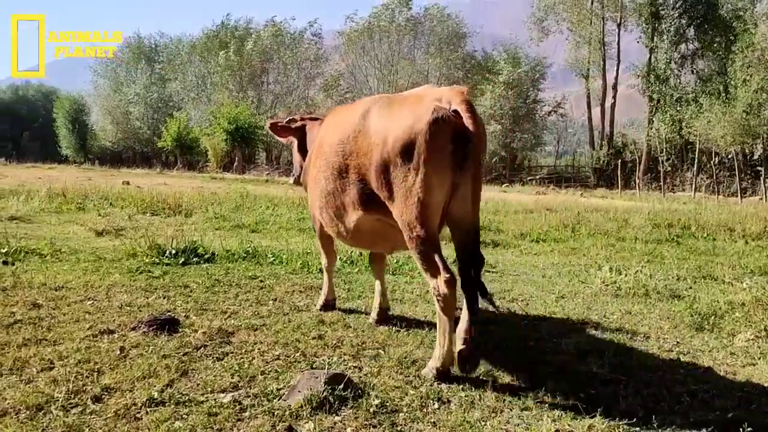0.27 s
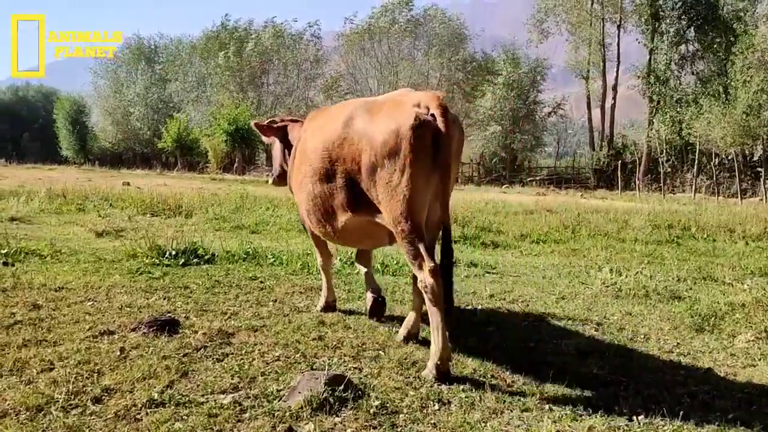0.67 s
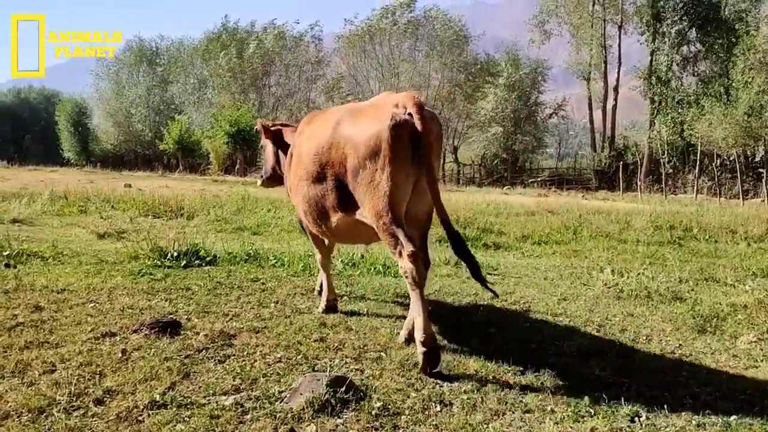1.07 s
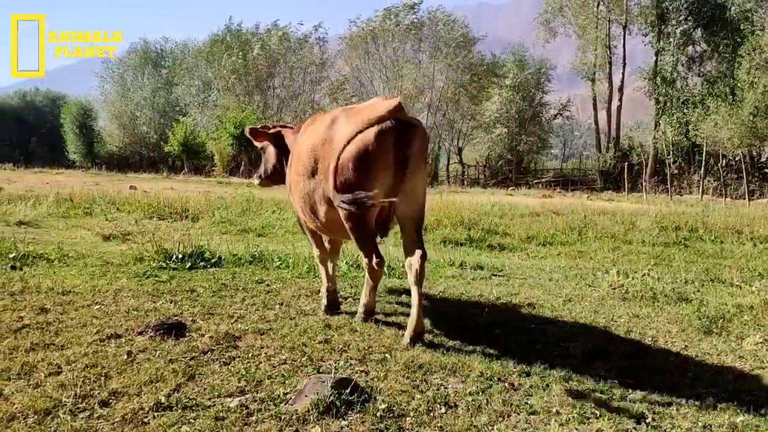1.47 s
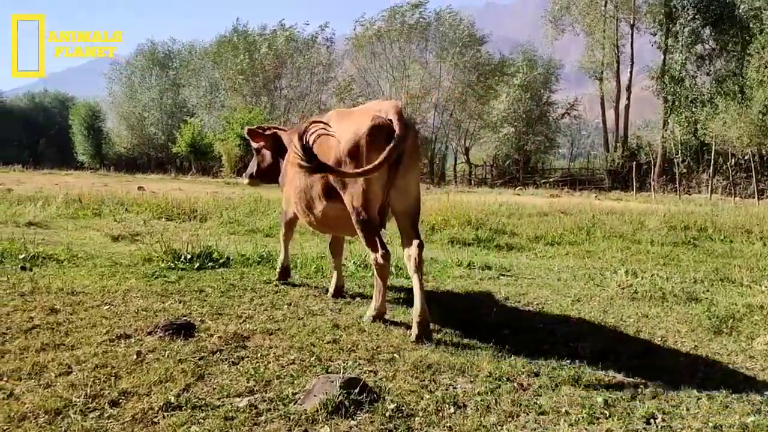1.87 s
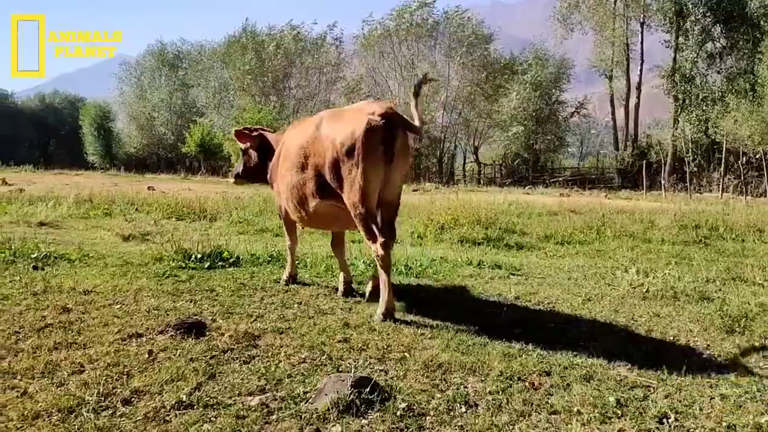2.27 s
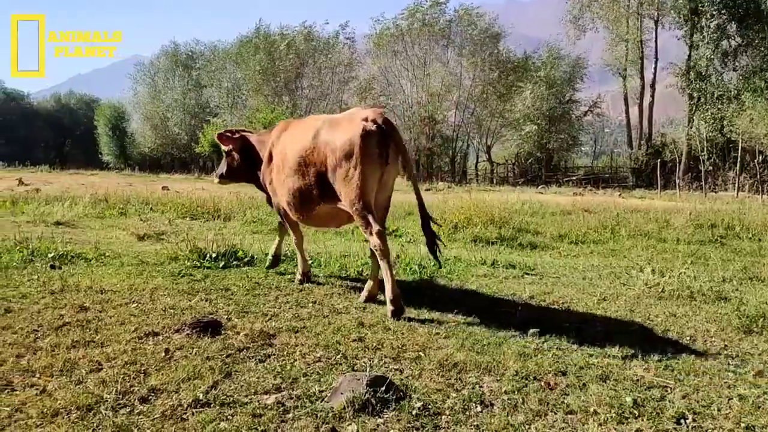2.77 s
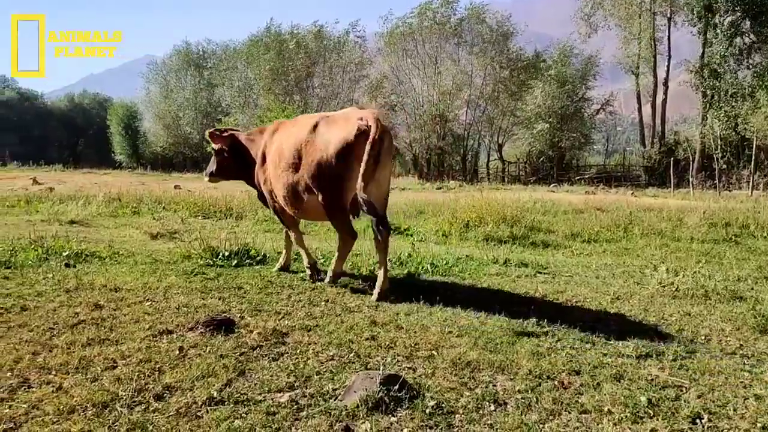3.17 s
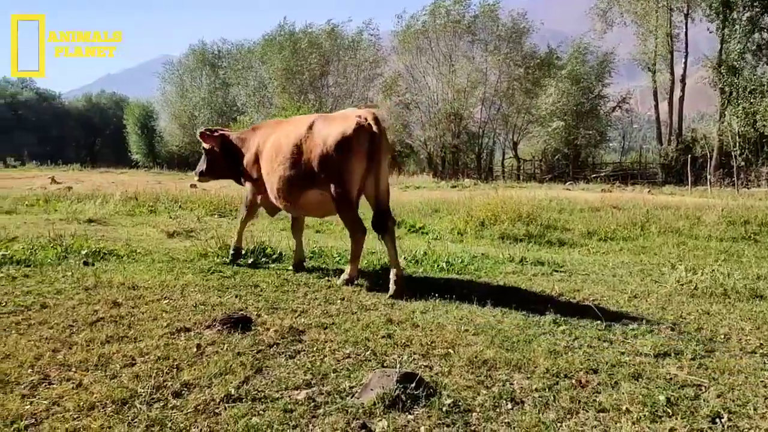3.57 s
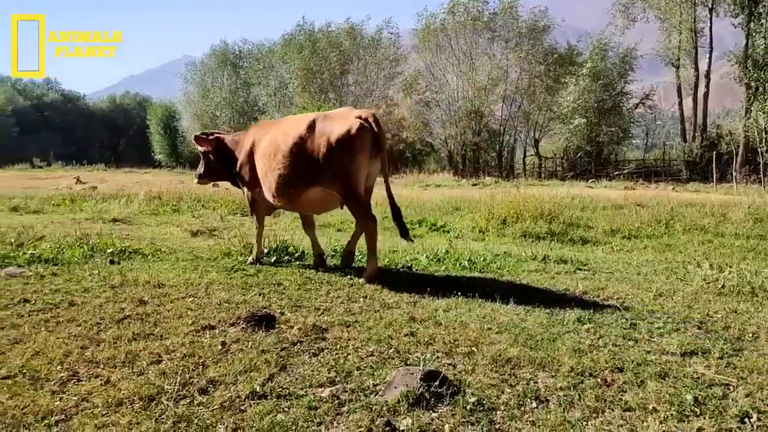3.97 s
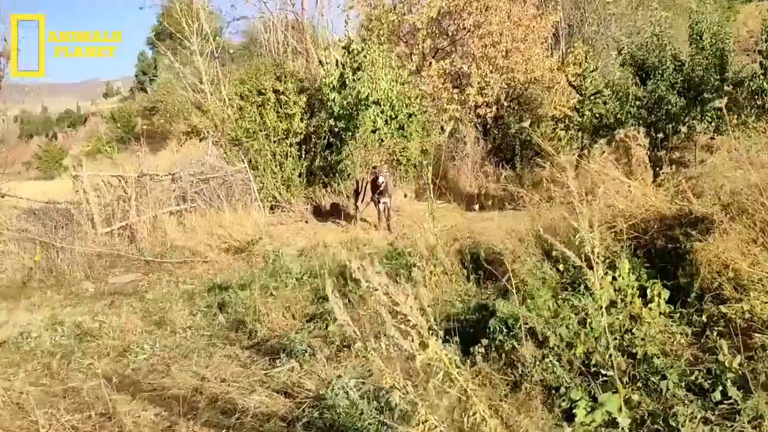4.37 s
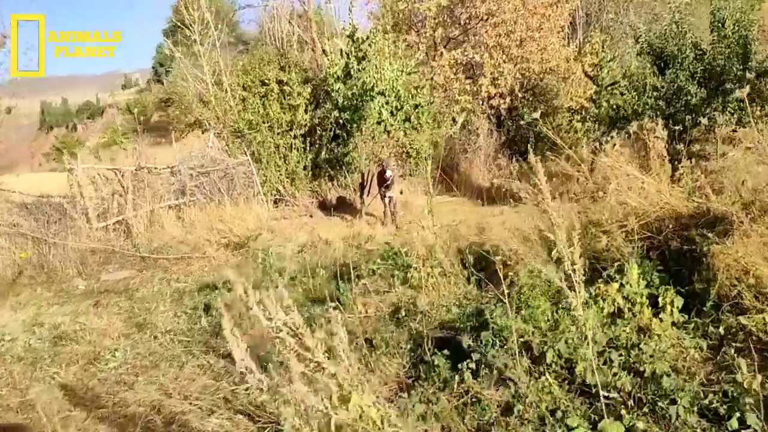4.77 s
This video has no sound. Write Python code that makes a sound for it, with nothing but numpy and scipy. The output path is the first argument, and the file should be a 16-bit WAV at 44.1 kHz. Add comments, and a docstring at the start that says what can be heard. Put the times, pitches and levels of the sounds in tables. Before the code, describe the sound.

From 0 to about 2.6 s an open pasture is quiet: a soft broad hiss of distant trees, light low wind rumble with small thumps on the microphone, faint chirping birds and thin far calls in the first second and a half, and tiny stalk ticks. Around 2.7 s a cow begins a low, buzzing nasal hum. At about 3.0 s its mouth opens and the moo becomes loud, deep and resonant, held nearly steady, then sagging from 3.6 s into a slow, rough rasp that ends near 4.1 s with a short diffuse echo. Wind is stronger here, with heavy buffets around 3.4 to 3.6 s and again near 4.2 s. At 4.25 s a higher, rough bleating call bursts in, loses its low voice by 4.6 s, and thins to a squeal flipping slightly upward until 4.95 s. Dry grass rustles close by from 4.35 s, with crisp snaps toward the end.

```python
"""A pasture: a cow moos, first a nasal hum, then through the open mouth as the voice sinks into a rasp.
A second, higher call thins to a squeal while dry grass rustles close by.
Both calls are fold pulses and sine harmonics, the pulses shaped by resonances of throat, mouth and nose.
Wind, grass and distant trees are coloured noise; small birds and thin far calls are gliding sines."""
import sys
import numpy as np
from scipy import signal
from scipy.fft import rfft, irfft, next_fast_len
from scipy.io import wavfile
from scipy.ndimage import uniform_filter1d, map_coordinates

SR = 44100
rng = np.random.default_rng(int(sys.argv[2]) if len(sys.argv) > 2 else 0)


def to_wav(s):
    """Save 16-bit WAV."""
    ch = np.atleast_2d(s).T  # columns
    pcm = np.round(np.clip(ch, -1, 1) * 32767)  # PCM
    wavfile.write(sys.argv[1], SR, pcm.astype(np.int16))


N = 221734


def seconds():
    """Time of every sample in seconds."""
    return np.arange(N) / SR


def amp(db):
    """Decibels to gain."""
    return 10 ** (np.asarray(db) / 20)


def unit(x):
    """x at rms 1."""
    return x / np.sqrt(np.mean(x ** 2) + 1e-20)


def along(points, hz):
    """(Hz, value) points read on a log frequency axis."""
    point_hz, value = np.transpose(points)
    return np.interp(np.log(hz + 1), np.log(point_hz + 1), value)


def curves(rows):
    """One value per sample for each column after the time."""
    time_s, *columns = np.transpose(rows)
    return [np.interp(seconds(), time_s, column) for column in columns]


def during(start, end, fade):
    """1 between two times, with linear fades inside them."""
    t = seconds()
    return np.clip(np.minimum(t - start, end - t) / fade, 0, 1)


def swell(start, attack, hold_until, t60, db):
    """Gain that rises, holds and dies away; times in seconds."""
    t = seconds()
    rise = 1 - np.exp(-np.maximum(t - start, 0) / attack)
    return rise * amp(db - 60 * np.maximum(t - hold_until, 0) / t60)


def wobble(rate_hz):
    """Smooth random curve through rate_hz random knots a second."""
    knots = rng.standard_normal(int(N * rate_hz / SR) + 4)
    return map_coordinates(knots, [np.arange(N) * rate_hz / SR])


def filtered(x, response):
    """x through a response given as a function of Hz."""
    size = 2 * next_fast_len(N // 2 + 8192)
    return irfft(rfft(x, size) * response(np.fft.rfftfreq(size, 1 / SR)), size)[..., :N]


def rush(spectrum, alike):
    """Stereo noise of rms 1 with a given colour and left-right likeness."""
    def mid_side_gain(hz):
        angle = np.arccos(np.clip(along(alike, hz), -1, 1)) / 2
        return amp(along(spectrum, hz)) * np.array([np.cos(angle), np.sin(angle)])
    mid, side = filtered(rng.standard_normal((2, N)), mid_side_gain)
    return unit(np.array([mid + side, mid - side]))


def pan(x, left_db):
    """Make left louder than right by left_db; negative leans right."""
    return x * amp([[left_db / 2], [-left_db / 2]])


# Wind strength on the microphone. Each row: time in seconds, strength in dB.
WIND_STRENGTH = [(0, -39), (0.12, -44), (0.21, -44), (0.38, -57), (0.6, -50.5), (0.7, -45), (0.85, -51),
                 (0.92, -45.5), (1.0, -47.5), (1.07, -43), (1.2, -47), (1.27, -55), (1.36, -46),
                 (1.43, -49), (1.53, -41.5), (1.69, -42), (1.77, -47.5), (1.94, -43), (2.01, -49),
                 (2.07, -44.5), (2.17, -46.5), (2.33, -42.5), (2.48, -43), (2.6, -37.5), (2.67, -43.5),
                 (2.9, -43), (3.2, -34), (3.55, -33.5), (3.72, -35.5), (3.87, -39.5), (4.06, -39),
                 (4.2, -38.5), (4.28, -38), (4.37, -37), (4.43, -43), (4.5, -39.5), (4.72, -43),
                 (4.88, -43.5), (5.03, -39)]
# Single buffets. Each row: centre in seconds, half length in seconds, level in dB, depth 0-1.
WIND_BUFFETS = [(0.028, 0.012, -27.5, 0.9), (0.185, 0.014, -37, 0.68), (0.786, 0.012, -41.5, 1),
                (1.09, 0.027, -39.5, 0.2), (1.62, 0.02, -41.5, 0.4), (1.672, 0.032, -37, 0.45),
                (1.961, 0.017, -37, 0.87), (2.058, 0.0078, -40.5, 0.25), (2.112, 0.0097, -31, 0.57),
                (2.323, 0.022, -40.5, 0.5), (2.396, 0.034, -43, 0), (2.54, 0.011, -36, 0.2),
                (2.706, 0.011, -32, 0.78), (3.024, 0.018, -30, 0.4), (3.184, 0.037, -29.5, 0),
                (3.371, 0.016, -24.5, 0.4), (3.415, 0.016, -26, 0.22), (3.481, 0.0098, -22, 0),
                (3.615, 0.027, -20.5, 0.34), (3.87, 0.021, -25.5, 1), (3.986, 0.016, -29, 0.18),
                (4.121, 0.011, -27, 0.13), (4.169, 0.017, -23, 0.07), (4.239, 0.011, -33, 0.4),
                (4.374, 0.033, -29, 0.9), (4.583, 0.014, -28, 0.4), (4.657, 0.018, -32.5, 0.26),
                (4.783, 0.018, -31.5, 0.63), (4.905, 0.011, -36, 0.3), (4.988, 0.016, -26.5, 0.68)]
# Side the wind strikes. Each row: time in seconds, left minus right in dB.
WIND_SIDE_DB = [(0, -2), (.7, -0.5), (1.2, -1.5), (1.8, -6.5), (2.3, -9), (2.7, -2.5), (3.5, -1), (4.3, 0),
                (4.8, -0.5)]
# Colour of the low wind noise. Each row: frequency in Hz, relative density in dB per Hz.
RUMBLE_COLOUR = [(10, -7.5), (28, 4), (45, 0.5), (62, 2), (90, -3), (130, -13.5), (200, -22), (400, -59),
                 (900, -110)]
# Colour of the faster wind noise. Each row: frequency in Hz, relative density in dB per Hz.
FLUTTER_COLOUR = [(30, -30), (65, -0.5), (100, -2), (150, -7), (220, -15), (320, -31), (500, -49),
                  (900, -80), (2000, -120)]
BREEZE_DB = -45.5  # strength at which the two levels below hold
RUMBLE_DB, RUMBLE_DB_PER_WIND_DB = -42.5, 0.77
FLUTTER_DB, FLUTTER_DB_PER_WIND_DB = -54, 1.55


def wind():
    """Eddies rumble on the microphone ports, brighter as the wind grows; single buffets thump."""
    t = seconds()
    gust_db = curves(WIND_STRENGTH)[0] - BREEZE_DB
    side_db, = curves(WIND_SIDE_DB)

    rumble_db = RUMBLE_DB + RUMBLE_DB_PER_WIND_DB * gust_db + 1.3 * wobble(15)
    rumble = amp(rumble_db) * rush(RUMBLE_COLOUR, [(25, 0.047), (70, 0.14), (200, 0.1)])
    flutter_db = FLUTTER_DB + FLUTTER_DB_PER_WIND_DB * gust_db + 6.85 * np.tanh(wobble(26))
    flutter = amp(flutter_db) * rush(FLUTTER_COLOUR, [(100, 0.88)])

    bounded = np.tanh(rush(FLUTTER_COLOUR, [(100, 0.88)]))  # a thump swings with bounded pressure
    eddies = filtered(bounded, lambda hz: 1 / (1 + (hz / 400) ** 6))
    sharp = unit(eddies)
    deep = unit(filtered(eddies, lambda hz: 1 / (1 + (hz / 75) ** 4)))
    thumps = 0
    for centre_s, half_s, db, depth in WIND_BUFFETS:
        push = np.exp(-((t - centre_s) / half_s) ** 2)
        thump = unit(push * ((1 - depth) * sharp + depth * deep))
        thumps += amp(db) * np.sqrt(np.mean(push ** 2)) * thump
    return (rumble + flutter + thumps) * amp([side_db / 2, -side_db / 2])


# Colour of the distant trees. Each row: frequency in Hz, relative density in dB per Hz.
TREES_COLOUR = [(180, -4), (300, -4), (620, -10), (781, -8), (921, -10), (1050, -8), (1140, -12),
                (1300, -10), (2830, -10), (3810, -11.5), (7360, -16), (8400, -24), (12500, -28.5),
                (15500, -30)]
# Level of the trees. Each row: time in seconds, level in dB.
TREES_LEVEL = [(0, -59), (4.12, -59.5), (4.15, -61.5), (4.5, -58.5)]
# Stereo spread of the trees. Each row: frequency in Hz, left-right likeness (1 = identical).
TREES_ALIKE = [(60, 0.02), (180, 0.097), (550, 0.85), (1650, 0.2), (4970, 0.23), (15000, 0.48)]


def trees():
    """Distant trees: a broad noise bed whose level sways slightly."""
    level_db = curves(TREES_LEVEL)[0] + 0.4 * wobble(3.2)
    return pan(amp(level_db) * rush(TREES_COLOUR, TREES_ALIKE), left_db=-2.5)


# Colour of brushing blades. Each row: frequency in Hz, relative density in dB per Hz.
STRAW_COLOUR = [(200, -2), (500, 6), (1400, 5), (2400, 6), (4000, -5), (7500, -1.5), (8800, -11),
                (12500, -7.5), (14200, -11), (14800, -44)]
# Stalks snapping. Each row: time in seconds, crackle in dB, body in dB re crackle, t60 in seconds.
STALK_SNAPS = [(0.1903, -70.5, 6, 0.2), (0.3062, -63, 0, 0.2), (0.338, -54, -10, 0.12),
               (0.4124, -68, -8, 0.19), (0.5367, -64.5, -14, 0.15), (0.6604, -65.5, -16, 0.16),
               (1.6315, -68, -4, 0.26), (2.1804, -64.5, -17, 0.29), (2.6034, -68, -6, 0.25),
               (4.581, -45.5, -17, 0.15), (4.766, -58.5, 10, 0.12), (4.816, -51.5, 10.5, 0.05),
               (4.908, -60, 7, 0.076)]


def grass():
    """Dry blades brush in dense crackles, and now and then a stalk bends and snaps."""
    t = seconds()
    grain = amp(1.7 * wobble(900) + 2.7 * wobble(45))
    rustle = unit(grain * rush(STRAW_COLOUR, [(500, 0.081), (2000, 0), (8000, 0.0)]))
    brush = swell(start=4.343, attack=0.16, hold_until=4.545, t60=1.82, db=-44.5) * rustle

    crackle, body = np.zeros(N), np.zeros(N)
    for snap_s, db, body_db, t60_s in STALK_SNAPS:
        bend_and_break = amp(db - 60 * np.maximum((snap_s - t) / 0.026, (t - snap_s) / t60_s))
        crackle += bend_and_break
        body += bend_and_break * amp(body_db)
    crisp_colour = [(2000, -23), (4500, 7.5), (8000, 4.0), (12500, 6.5), (14200, 5), (15000, -25)]
    dull_colour = [(200, -1), (600, 10.0), (2000, 3.5), (4000, -4.5), (8000, -27)]
    crisp = crackle * rush(crisp_colour, [(8000, 0.08)])
    dull = body * rush(dull_colour, [(1000, 0.14)])
    return pan(brush + (crisp + dull) * unit(amp(4.8 * wobble(500))), left_db=-6.0)


# Far birds. Each row: start in seconds, start pitch in Hz, end pitch in Hz, length in seconds,
# level in dB, hoarseness as a share of the pitch.
BIRD_CHIRPS = [(0.332, 4320, 3100, 0.11, -59, 0.11), (0.734, 4810, 3250, 0.13, -61, 0.09),
               (1.062, 4480, 5730, 0.082, -62.5, 0.12), (1.271, 4280, 2574, 0.09, -58.5, 0.14),
               (1.744, 4840, 3355, 0.17, -59, 0.12), (2.416, 5630, 4150, 0.081, -60, 0.2),
               (2.495, 2760, 3790, 0.051, -61.5, 0.079), (4.131, 5140, 4320, 0.054, -58.5, 0.055),
               (4.941, 4060, 4130, 0.047, -59.5, 0.048)]
# Thin far calls. Each row: start in seconds, end in seconds, pitch in Hz, level in dB.
FAR_NOTES = [(0.335, 0.46, 1088, -63.5), (0.5, 0.65, 1088, -69.5), (.7, 0.798, 1075, -62.5),
             (.81, 1.1, 1060, -67), (1.09, 1.416, 1052, -67.5), (0.32, 0.42, 2440, -69),
             (0.43, 0.6, 2440, -67.5), (0.673, 0.76, 2420, -69.5)]
FAR_SAG_PER_S, FAR_WAVER = 0.032, 0.0034  # shares of the pitch


def far_animals():
    """Sliding sines with hoarse pitch noise chirp; thin sines sag slowly."""
    t = seconds()
    out = np.zeros(N)
    trill = wobble(700)
    for start_s, start_hz, end_hz, length_s, db, hoarse in BIRD_CHIRPS:
        progress = np.clip((t - start_s) / length_s, 0, 1)
        pitch_hz = (start_hz + (end_hz - start_hz) * progress) * (1 + hoarse * trill)
        out += amp(db) * np.sin(np.pi * progress) * np.sin(2 * np.pi * np.cumsum(pitch_hz) / SR)

    waver = 1 + FAR_WAVER * wobble(59.0)
    flicker = amp(1.3 * wobble(11.76))
    for start_s, end_s, hz, db in FAR_NOTES:
        pitch_hz = hz * waver * (1 - FAR_SAG_PER_S * (t - start_s))
        tone = np.sin(2 * np.pi * np.cumsum(pitch_hz) / SR)
        out += amp(db) * flicker * during(start_s, end_s, fade=0.021) * tone
    return out


# Echo decay. Each row: frequency in Hz, t60 in seconds.
FIELD_DECAY = [(200, 0.57), (1500, 0.49), (5000, 0.94), (12000, 0.025)]


def echo(x):
    """Diffuse answer of the ground and the tree line: decaying stereo noise convolved with x."""
    hz, t, bins = signal.stft(rng.standard_normal((2, SR)), SR, nperseg=256)
    decay = amp(-60 * t / along(FIELD_DECAY, hz)[:, None])
    tail = signal.istft(bins * decay, SR, nperseg=256)[1]
    return signal.fftconvolve(x[None], tail / np.linalg.norm(tail[0]), axes=1)[:, :N]


def folds(cycles, rough, jitter_s, shimmer_db, air):
    """One vocal fold pulse per cycle, uneven in time and size when rough, each with a turbulent puff."""
    at = np.flatnonzero(np.diff(np.floor(cycles)) > 0)
    chance = rng.standard_normal((len(at), 2))
    when = np.interp(np.floor(cycles[at + 1]), cycles, np.arange(N))
    when = when + jitter_s * SR * rough[at] * chance[:, 0]
    # windowed sincs place pulses between samples
    taps = np.floor(when)[:, None] + np.arange(-7, 9)
    offset = taps - when[:, None]
    shape = np.sinc(offset) * np.cos(np.pi * offset / 16) ** 2
    sizes = amp(shimmer_db * rough[at] * chance[:, 1])
    places = np.clip(taps, 0, N - 1).astype(int)
    pulses = np.bincount(places.ravel(), (shape * sizes[:, None]).ravel(), N)
    puffs = rng.standard_normal(N) * np.exp(-3.5 * (cycles % 1))
    return unit(pulses) + air * rough * unit(puffs)


def tract(x, modes):
    """Causal filter with steep-sided resonances, made minimum-phase through the cepstrum."""
    def response(hz):
        power = sum(amp(db) ** 2 / (1 + ((hz - centre_hz) / (width_hz / 2)) ** 2) ** 2
                    for centre_hz, width_hz, db in modes)
        cepstrum = irfft(np.log(power + 1e-12) / 2)
        half = len(cepstrum) // 2
        cepstrum[1:half] *= 2
        cepstrum[half:] = 0
        return np.exp(rfft(cepstrum))
    return filtered(x, response)


def morph(x, shapes, position):
    """x through a tract that glides from one shape to the next as position passes 0, 1, 2."""
    position = np.clip(position, 0, len(shapes) - 1)
    return sum(np.maximum(1 - np.abs(position - k), 0) * tract(x, modes)
               for k, modes in enumerate(shapes))


def scatter(x, above_hz, decay_s):
    """Ground and body answer within milliseconds and blur the treble of every pulse."""
    t = np.arange(SR // 20) / SR
    spread = rng.standard_normal(len(t)) * amp(-60 * t / decay_s)
    phase = np.angle(rfft(np.pad(spread, len(t))))
    spread = irfft(np.exp(1j * phase))  # smears time, keeps the colour
    blurred = signal.fftconvolve(x, spread)[len(t):len(t) + N]
    direct = lambda hz: 1 / (1 + (hz / above_hz) ** 20)
    clear_bass = filtered(x, lambda hz: np.sqrt(direct(hz)))
    return clear_bass + filtered(blurred, lambda hz: np.sqrt(1 - direct(hz)))


# Voice of the moo. Each row: time in seconds, pitch in Hz, roughness 0-1.
MOO_VOICE = [(2.66, 90.43, 0.11), (2.754, 94.1, 0.18), (2.834, 98.77, 0.16), (2.895, 103.7, 0.15),
             (2.938, 102.5, 0.13), (3.001, 99.4, 0.08), (3.08, 103.2, 0.18), (3.35, 104.2, 0.08),
             (3.532, 104.1, 0.25), (3.646, 99.5, 0.14), (3.792, 92.8, 0.23), (3.86, 88.76, 0.37),
             (3.92, 81.14, 0.65), (3.968, 69.94, 0.94), (3.99, 65.9, 1), (4.09, 56.7, 0.8)]
# Open mouth. Each row: resonance in Hz, width in Hz, relative level in dB.
MOUTH_OPEN = [(489, 156, -5.5), (605.4, 41, -2), (870, 95, -8.5), (1018, 27, -3), (1146, 67, 0.5),
              (1191, 110, -4.5), (1338, 60, -3.5), (1530, 130, -14), (1806, 220, -12.5), (2227, 170, -11),
              (2367, 76, -13.5), (2550, 120, -20), (2840, 250, -18.5), (3220, 140, -23), (3480, 170, -22),
              (4010, 110, -27.5), (4490, 250, -25.5), (2570, 4000, -32), (6400, 4900, -41.5),
              (10200, 2500, -42)]
# Slackening mouth. Each row: resonance in Hz, width in Hz, relative level in dB.
MOUTH_SLACK = [(412.5, 113.7, -7.5), (614, 51, -3.5), (713, 150, -7.5), (1022, 36, -5), (1130, 110, 1),
               (1375, 74, -4), (1660, 250, -16.5), (1826, 72, -13), (2180, 170, -15), (2335, 140, -18),
               (2860, 210, -18), (3470, 230, -27), (3830, 120, -31), (2400, 2500, -32), (5940, 5000, -38.5),
               (10400, 1600, -46)]
# Mouth in the closing rasp. Each row: resonance in Hz, width in Hz, relative level in dB.
MOUTH_RASP = [(383, 340, -5.5), (613, 190, -7.5), (1095, 91.5, 1.5), (1345, 99, -3.5), (1670, 180, -10.5),
              (1860, 210, -15.5), (2390, 250, -12.5), (2810, 140, -21), (3153, 82, -20), (3530, 82, -30),
              (3800, 120, -31), (2400, 2600, -31.5), (6000, 2920, -39.5)]
# Mouth movement. Each row: time in seconds, shape (0 open, 1 slack, 2 rasp).
MOUTH_SHAPE = [(3.48, 0.12), (3.63, 1), (3.74, 1.1), (3.85, 1.65)]
# Nose. Each row: resonance in Hz, width in Hz, level in dB, start in seconds,
# end of hold in seconds, t60 in seconds.
NOSE_MODES = [(454, 510, -55.5, 2.674, 2.95, 0.66), (990, 980, -61.5, 2.685, 2.89, 1),
              (1678, 75, -59, 2.695, 2.91, 0.76), (1930, 180, -58.5, 2.685, 2.81, 0.79),
              (2383, 180, -55.5, 2.7, 2.9, 1.4), (2955, 130, -57, 2.64, 2.82, 0.6),
              (3150, 190, -55.5, 2.69, 2.79, 0.39), (3526, 170, -55, 2.7, 2.76, 1.3),
              (4320, 95, -63.5, 2.5, 2.73, 0.42), (4700, 390, -56.5, 2.668, 2.717, 0.67),
              (5740, 1600, -70, 2.65, 2.94, 1)]
# Head and chest boom, which the lowest harmonics slide through. Each row: frequency in Hz, level in dB.
CHEST_BOOM = [(65, -47), (100, -35), (165, -39.5), (193, -39), (208, -36), (240, -42.5), (268, -32),
              (283, -41), (312, -54), (400, -89)]
# Change of harmonics 1-4 of the boom while the mouth is shut, in dB.
CLOSED_HARMONICS_DB = (-3.5, -8, -40, -22)
MOUTH_OPENS_S, MOUTH_HOLD_UNTIL_S, MOUTH_DB = 3.028, 3.897, -21
LIPS_LEAK_DB = -18.5  # closed lips against the open mouth
BOOM_T60_S, NOSE_ATTACK_S = 0.91, 0.05
QUAVER_DB = 1  # unsteadiness of the mouth voice


def moo():
    """Slow fold pulses leave by nose, then mouth; low harmonics boom from head and chest."""
    t = seconds()
    start_s, end_s = MOO_VOICE[0][0], MOO_VOICE[-1][0]
    hz, rough = curves(MOO_VOICE)
    rough = np.clip(rough, 0, 1)
    cycles = np.cumsum(hz * (1 + 0.00926 * rough * wobble(45))) / SR
    crisp = folds(cycles, rough, jitter_s=0.00016, shimmer_db=3.5, air=0.4)
    crisp = crisp / np.sqrt(uniform_filter1d(crisp ** 2, size=4096))  # even loudness

    # pressure builds up behind the lips
    pressure = np.clip((t - start_s) / (MOUTH_OPENS_S - start_s), 0, 1) ** 3
    spent_s = np.maximum(t - MOUTH_HOLD_UNTIL_S, 0)
    harmonics = 0
    for k, closed_db in enumerate(CLOSED_HARMONICS_DB, 1):
        level_db = along(CHEST_BOOM, k * hz) + closed_db * (1 - pressure)
        harmonics += amp(level_db) * np.sin(2 * np.pi * k * cycles)
    boom = np.sqrt(2) * harmonics * amp(-60 * spent_s / BOOM_T60_S)

    leak = amp(MOUTH_DB + LIPS_LEAK_DB) * pressure
    opening = swell(MOUTH_OPENS_S, 0.018, MOUTH_HOLD_UNTIL_S, t60=0.39, db=MOUTH_DB)
    quaver = amp(QUAVER_DB * wobble(24.05))
    blurred = scatter(crisp, above_hz=2000, decay_s=0.031)
    voice = morph(blurred, [MOUTH_OPEN, MOUTH_SLACK, MOUTH_RASP], curves(MOUTH_SHAPE)[0])
    mouth = np.maximum(opening, leak) * quaver * voice

    nasal = scatter(crisp, above_hz=2600, decay_s=0.015)
    nose = 0
    for centre_hz, width_hz, db, ring_s, hold_until_s, t60_s in NOSE_MODES:
        ring = unit(tract(nasal, [(centre_hz, width_hz, 0)]))
        nose += swell(ring_s, NOSE_ATTACK_S, hold_until_s, t60_s, db) * ring
    return (boom + mouth + nose) * during(start_s, end_s, fade=0.032)


# Squeal: holds, sags, flips upward. Each row: time in seconds, pitch in Hz, level in dB,
# mouth opening 0-1.
SQUEAL_VOICE = [(4.256, 455, -46, 0.42), (4.292, 457.5, -37, 0.17), (4.34, 457.6, -35.5, 0.27),
                (4.378, 456.4, -31, 0.23), (4.52, 458.5, -32, 0.47), (4.62, 460, -35.5, 0.64),
                (4.7, 458.7, -38, 0.73), (4.81, 451.8, -41.5, 0.94), (4.845, 461.4, -43.5, 0.87),
                (4.885, 469, -40, 0.61), (4.912, 484, -44.5, 0.1), (4.945, 488, -56, 0)]
# Squeal harmonics, from the first. Each row: dB with the mouth narrow, dB with it wide.
SQUEAL_OVERTONES = [(1.5, -16), (-21, -0.5), (-19.5, 0.5), (-44, -12), (-53, -12), (-45, -9.5), (-58, -15),
                    (-69, -12)]
# Low register, at a third of the squeal's pitch. Each row: time in seconds, level in dB,
# roughness 0-1, throat shape (0 tight, 1 wide).
BLEAT_VOICE = [(4.249, -31, 0.49, 0), (4.29, -24, 0.29, 0.047), (4.335, -21.5, 0.27, 0.24),
               (4.365, -18, 0.39, 0.32), (4.4, -18.5, 0.24, 0.41), (4.45, -21.5, 0.23, 0.95),
               (4.51, -23, 0.38, 0.94), (4.55, -29.5, 0.79, 0.76), (4.61, -38, .7, 0.75)]
# Tight throat. Each row: resonance in Hz, width in Hz, relative level in dB.
THROAT_TIGHT = [(312, 66, -20), (727, 270, -10), (1050, 50, -11), (1193, 91, 0), (1610, 170, -5.5),
                (1790, 150, -16), (2040, 190, -9.5), (2950, 130, -19), (3390, 155, -12.5), (3844, 114, -14),
                (7200, 2400, -43)]
# Widened throat. Each row: resonance in Hz, width in Hz, relative level in dB.
THROAT_OPEN = [(312, 51, -17.5), (600, 80, -17), (770, 100, -9.5), (1206, 74, 1), (1590, 85, -5),
               (2040, 300, -28), (2910, 190, -23), (3440, 225, -13.5), (3860, 160, -17),
               (7100, 1500, -33.5)]
TIRES_AT_S, DULLS_DB_PER_S = 4.5, 30.5  # from here harmonics 3 and up fade


def high_call():
    """A squeal with a rough lower voice locked to every third cycle, which drops out midway."""
    t = seconds()
    hz, level_db, gape = curves(SQUEAL_VOICE)
    cycles = np.cumsum(hz * (1 + 0.0026 * wobble(60) + 0.00128 * wobble(10))) / SR
    dull_db = DULLS_DB_PER_S * np.maximum(t - TIRES_AT_S, 0)
    tone = 0
    for k, (narrow_db, wide_db) in enumerate(SQUEAL_OVERTONES, 1):
        harmonic_db = (1 - gape) * narrow_db + gape * wide_db - (k > 2) * dull_db
        tone += amp(harmonic_db) * np.sin(2 * np.pi * k * cycles)
    squeal = np.sqrt(2) * tone * amp(level_db)
    squeal = squeal * during(SQUEAL_VOICE[0][0], SQUEAL_VOICE[-1][0], fade=0.01)

    bleat_db, rough, shape = curves(BLEAT_VOICE)
    source = folds(cycles / 3, np.clip(rough, 0, 1), jitter_s=0.000025, shimmer_db=3, air=0.45)
    bleat = morph(source, [THROAT_TIGHT, THROAT_OPEN], shape) * amp(bleat_db)
    return squeal + bleat * during(BLEAT_VOICE[0][0], BLEAT_VOICE[-1][0], fade=0.022)


def scene():
    """Two calls straight ahead, distant life behind, wind and grass at the microphone."""
    low, high, far = moo(), high_call(), far_animals()
    # leaves throw back mostly treble
    leaves_db = [(200, -12.5), (1100, -5), (2500, -6.0), (6000, -4.0)]
    returned = filtered(echo(low)[0], lambda hz: amp(along(leaves_db, hz)))
    calls = low + returned + high + amp(-12.5) * echo(high)
    distant = pan(far + amp(-3.5) * echo(far), left_db=1)
    return calls + distant + trees() + wind() + grass()


TOP_HZ = 15500


def record(dry):
    """Nothing is kept from the band limit up."""
    return filtered(dry, lambda hz: hz < TOP_HZ)


dry = scene()
out = record(dry)
to_wav(out)
```